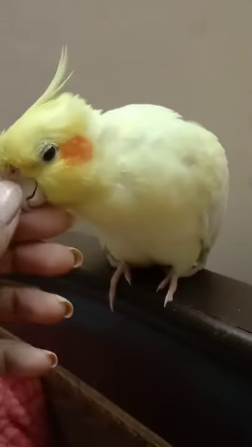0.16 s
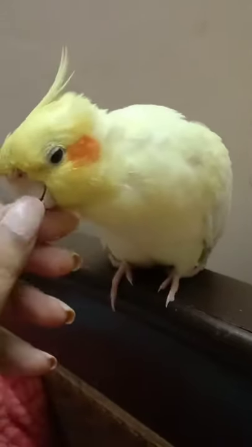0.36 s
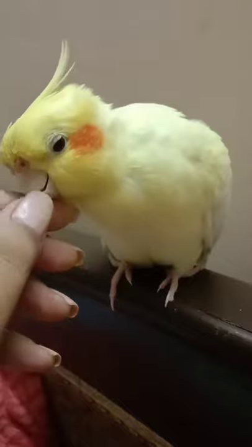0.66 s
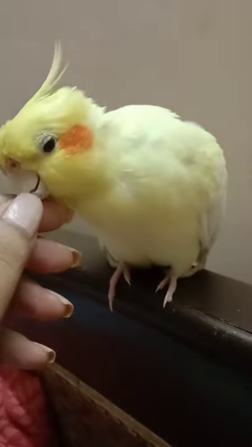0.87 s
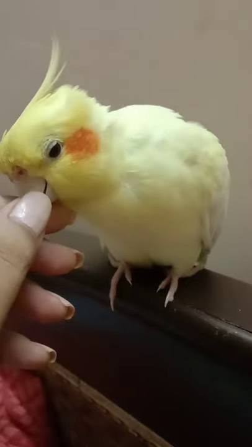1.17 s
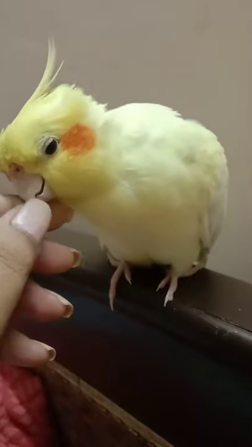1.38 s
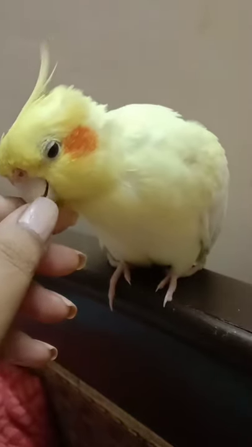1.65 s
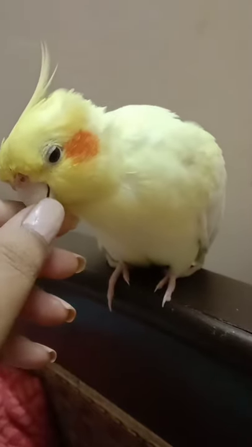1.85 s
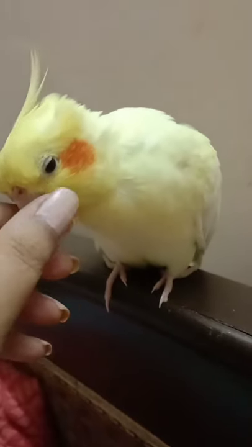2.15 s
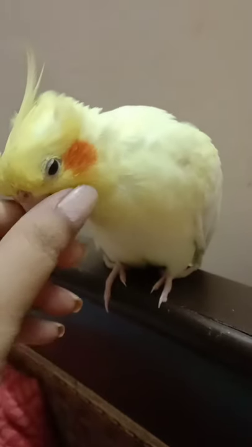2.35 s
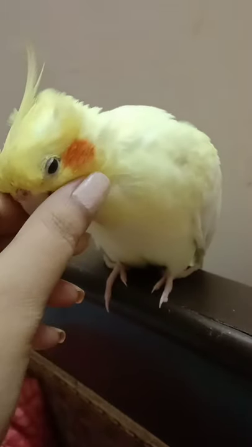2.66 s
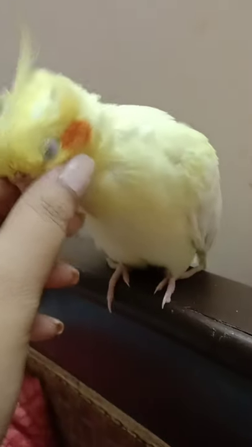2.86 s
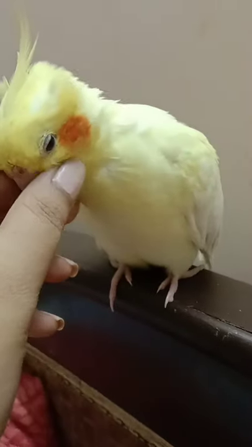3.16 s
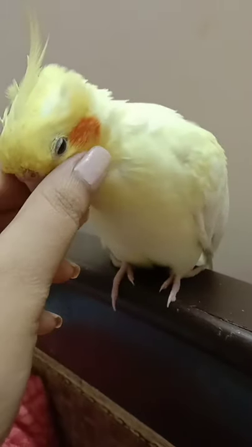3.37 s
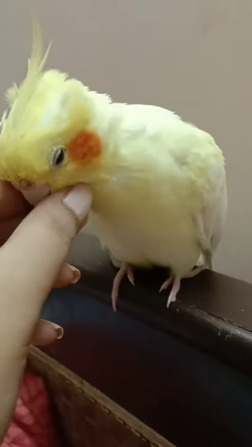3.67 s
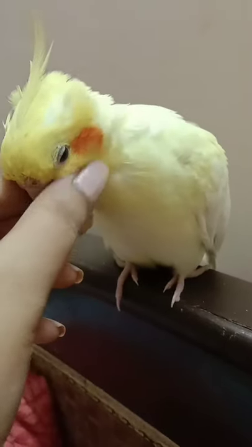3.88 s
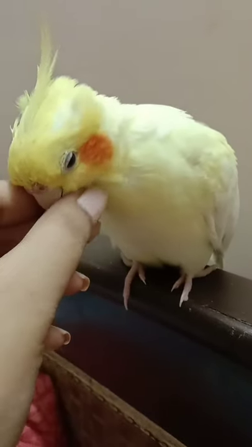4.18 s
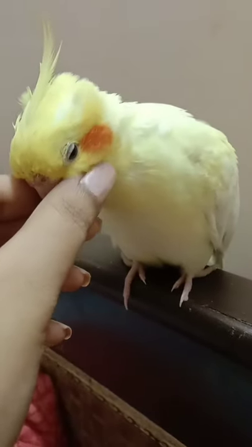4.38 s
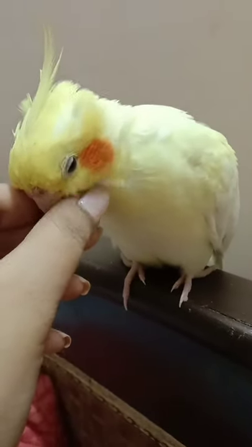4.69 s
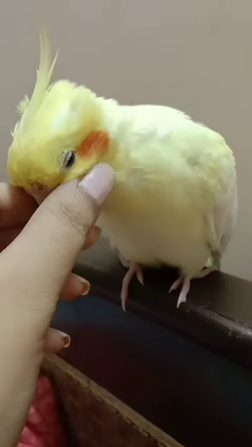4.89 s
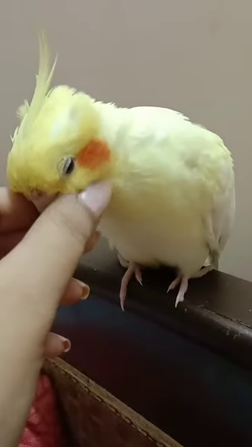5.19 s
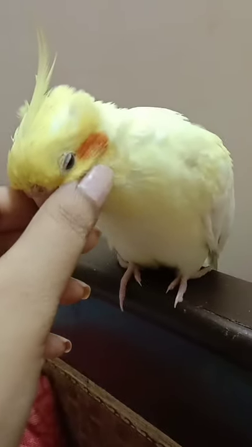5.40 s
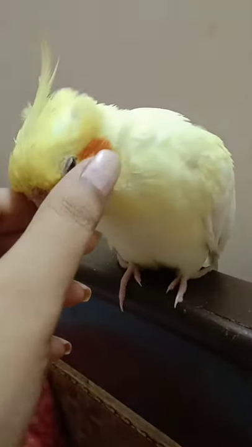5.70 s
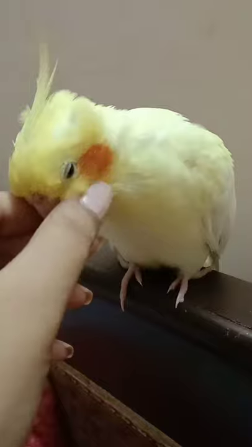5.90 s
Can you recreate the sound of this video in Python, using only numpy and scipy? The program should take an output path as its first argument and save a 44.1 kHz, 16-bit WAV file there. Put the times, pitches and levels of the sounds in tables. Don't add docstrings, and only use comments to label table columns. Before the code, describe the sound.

Two sharp, piercing bird chirps ring off nearby walls in a quiet home, with small knocks and scrapes, low lumpy hum and distant insects.

```python
import sys
import numpy as np
from scipy import signal
from scipy.fft import rfft, irfft, next_fast_len
from scipy.io import wavfile
from scipy.ndimage import uniform_filter1d, map_coordinates

SR = 44100
rng = np.random.default_rng(int(sys.argv[2]) if len(sys.argv) > 2 else 0)


def waveform_to_disk(signal):
    frames = np.transpose(np.atleast_2d(signal))
    scaled = np.clip(frames, -1, 1) * 32767
    samples = np.round(scaled).astype(np.int16)
    wavfile.write(sys.argv[1], SR, samples)


def boost(x):
    u = np.asarray(x, float) / 20
    return 10 ** u


N = 266364


def unit(x):
    return x / np.sqrt(np.mean(x ** 2) + 1e-20)


def along(points, hz):
    f, v = np.transpose(points)
    return np.interp(np.log(hz + 1), np.log(f + 1), v)


def wobble(rate):
    return map_coordinates(rng.standard_normal(N // 32), [np.arange(N) * rate / SR])


def filtered(x, response):
    m = next_fast_len(len(x) + SR // 4)
    return irfft(rfft(x, m) * response(np.fft.rfftfreq(m, 1 / SR)), m)[:len(x)]


def above(x, edge_hz):
    return filtered(x, lambda hz: 1 / (1 + (edge_hz / (hz + 1)) ** 12))


def rush(spectrum, patchy_db, size):
    z = signal.stft(rng.standard_normal(N), nperseg=512)[2]
    field = rng.standard_normal(z.shape)
    field = uniform_filter1d(field, size[0], axis=0)
    field = uniform_filter1d(field, size[1], axis=1)
    x = signal.istft(z * boost(patchy_db * unit(field)), nperseg=512)[1][:N]
    return unit(filtered(x, lambda hz: boost(along(spectrum, hz))))


# f/Hz, density/dB per Hz
INSECTS = [(1760, -43.5), (3000, -20), (3620, -12.5), (4180, -26.5), (4300, -7), (5010, -28), (5180, -4.5),
           (5520, -2), (6250, 0), (8650, .5), (9150, -12), (10400, -8), (11550, -10), (12300, -5),
           (15000, 0.5), (15700, -12)]
# t/s, level in 5.5-9 kHz/dB, swell lag/s, share of power that comes and goes/0-1
DRIFT = [(0, -65.5, 0.0042, .9), (.5, -62.5, .03, .6), (.95, -63, 0.031, .8), (1.4, -63.5, 0.011, .68),
         (2.2, -64, .02, .62), (3.0, -65, .03, 0.7), (3.5, -63, .035, 0.8), (4.4, -65, .04, .7),
         (4.95, -66.5, 0.064, .84), (5.3, -64, .065, .72), (5.9, -66, .03, .65)]
THROB_S = .303


def insects():
    t = np.arange(N) / SR
    s, strength_db, late_s, depth = np.transpose(DRIFT)
    turn = (t - np.interp(t, s, late_s)) / THROB_S
    depth = np.clip(np.interp(t, s, depth), 0, 1)
    throb = np.sqrt(1 - depth * np.sin(np.pi * turn) ** 2)
    smooth = above(rush(INSECTS, patchy_db=0.72, size=(5, 8)), edge_hz=4920)
    low_edge = [(1000, -38), (1500, -3.0), (3000, -9.5), (4400, 1.5), (5000, -7.0), (5600, -58.0)]
    blotchy = rush(low_edge, patchy_db=4, size=(2, 14))
    level_db = np.interp(t, s, strength_db) + 0.26 * wobble(rate=2.9)
    return boost(level_db) * throb * (boost(6.5) * smooth + boost(-9) * blotchy)


# f/Hz, density/dB per Hz
RUMBLE = [(15, -49), (25, -16), (59, -18), (103, 1), (248, -13), (318, -19), (500, -25), (650, -53),
          (1100, -120)]
# f/Hz, density/dB per Hz
AIR = [(180, -43.5), (300, 2), (630, -6), (684, -8.5), (907, -7), (1130, -7), (2350, -19), (4500, -7),
       (5000, -13.5), (6500, -39.5), (11000, -120)]
# t/s, level over steady hum/dB
LUMPS = [(.04, 8.5), (.22, 8.5), (.44, 13.5), (.63, 11), (.95, 2.5), (1.35, 8), (1.54, 4.5), (2.2, 5),
         (2.39, 5.5), (2.7, 5.5), (2.86, 8.5), (3.25, 12), (3.36, 8), (3.63, 9.5), (3.98, 6.5), (4.13, 4.5),
         (4.28, 10), (4.48, 3.5), (4.65, 5.5), (5.19, 12.5), (5.35, 8), (5.45, 6), (5.85, 6.5)]
HUM_DB, LUMP_S = -73, .03


def house():
    grid_s = np.arange(0, N / SR, .004)
    bumps_db = sum(db * np.exp(-((grid_s - s) / LUMP_S) ** 2 / 2) for s, db in LUMPS)
    lumps_db = np.interp(np.arange(N) / SR, grid_s, bumps_db)
    rumble = unit(boost(1.5 * wobble(rate=11)) * rush(RUMBLE, patchy_db=.5, size=(1, 6)))
    hum = boost(HUM_DB + lumps_db) * rumble
    air = boost(-77.0 + 0.46 * wobble(rate=2.6)) * rush(AIR, patchy_db=3.0, size=(2, 12))
    return hum + air


# multiple, level/dB
OVERTONES = [(2, -16), (3, -17.5)]
# f/Hz, gain/dB
BEAK = [(4500, -0.5), (6500, -1.5), (8300, 6), (10000, -6), (11600, -9.5), (12900, 4), (13900, -7),
        (15300, -2.5)]
# t/s, pitch f/Hz, level/dB, roughness/0-1
RISE = [
    (0.3014, 2230, -35.5, 0.02),
    (0.3059, 2342, -31.5, 0.1),
    (.311, 4440, -28, .2),
    (.320, 4208, -23, 0.24),
    (.328, 6000, -23, 0.14),
    (.340, 6350, -27, .2),
    (.354, 6000, -32, .14),
]
SWOOP = [
    (0.4053, 2250, -28, 0),
    (.411, 2330, -25.5, 0.026),
    (.429, 3002, -31, .07),
    (.443, 5850, -28, .06),
    (0.456, 5844, -33.5, .12),
    (0.457, 3818, -29.5, 0.12),
    (.481, 3625, -31, .06),
    (.487, 2017, -35.5, .04),
    (.497, 1820, -40, .05),
]
ARCH = [
    (3.075, 3587, -31.5, .03),
    (3.083, 4050, -26, .03),
    (3.089, 5950, -30.5, .2),
    (3.104, 5306, -27, .25),
    (3.114, 4787, -28.5, .08),
    (3.146, 5154, -26.5, 0.089),
    (3.169, 5542, -27.5, .15),
]
FALL = [
    (3.187, 2616, -28.5, .02),
    (3.206, 2675, -31, 0.044),
    (3.224, 2251, -40, .5),
    (3.229, 6085, -33, .5),
    (3.240, 4724, -28, 1),
    (3.250, 3796, -23.5, 1),
    (3.262, 3584, -23, .25),
    (3.284, 3494, -26, .06),
]


def bird():
    t = np.arange(N) / SR
    syllables = (RISE, SWOOP, ARCH, FALL)
    s, pitch_hz, level_db, share = np.transpose(RISE + SWOOP + ARCH + FALL)
    sounding = sum((t >= rows[0][0]) & (t < rows[-1][0]) for rows in syllables)
    rough = np.clip(np.interp(t, s, share), 0, 1)

    gain = sounding * boost(np.interp(t, s, level_db) + 11.5)
    gain = uniform_filter1d(uniform_filter1d(gain, size=50), size=50)
    gain = gain * boost(9 * rough * np.tanh(wobble(rate=500)))

    pitch = uniform_filter1d(np.interp(t, s, pitch_hz), size=40)
    pitch = pitch * np.exp(.26 * rough * np.tanh(wobble(rate=700)))
    phase = 2 * np.pi * np.cumsum(pitch) / SR

    turned_db = -3.5 * (t > 2)
    upper = 0
    for k, db in OVERTONES:
        overtone_db = db + (k - 1.5) * turned_db + along(BEAK, k * pitch)
        upper = upper + boost(overtone_db) * (k * pitch < SR / 2) * np.sin(k * phase)
    hiss = boost(-35.5 + 20 * rough) * above(rng.standard_normal(N), edge_hz=3400)
    return above(gain * (np.sin(phase) + upper + hiss), edge_hz=1900)


# f/Hz, t60/s
ROOM = [(200, 0.9), (1800, 0.35), (4750, 0.41), (12500, 0.42)]


def tail(stretch):
    hz, t, z = signal.stft(rng.standard_normal(SR // 2), SR, nperseg=256)
    t60_s = stretch * along(ROOM, hz)[:, None]
    x = signal.istft(z * boost(-60 * t / t60_s), SR, nperseg=256)[1]
    return x / np.linalg.norm(x)


# delay/s, level/dB
WALLS = [
    (.0045, -6),
    (.0105, -2.5),
    (.016, -6),
    (.021, -15),
    (.031, -10),
]
# f/Hz, level/dB, t60/s
RINGS = [(3605, -40, .4)]
SOAK_HZ, SOAK_DB = 2860, -6.5


def room(x):
    t = np.arange(SR) / SR
    answer = np.zeros(SR)
    answer[0] = 1
    short = t[:SR // 100]
    for delay_s, db in WALLS:
        smear = 0.067 * boost(-60 * short / 0.012) * rng.standard_normal(len(short))
        smear[0] = 1
        answer[round(delay_s * SR):][:len(short)] += boost(db) * smear
    late = tail(stretch=0.84)
    answer[:len(late)] += boost(6) * late * (1 - np.exp(-t[:len(late)] / 0.0081))
    answer[1:] = filtered(answer[1:], lambda hz: boost(SOAK_DB / (1 + (hz / SOAK_HZ) ** 8)))
    for hz, db, t60_s in RINGS:
        answer += boost(db - 25.0 - 60 * t / t60_s) * np.sin(2 * np.pi * hz * t)
    return signal.fftconvolve(x, answer)[:N]


# f/Hz, width/Hz, level/dB
FURNITURE = [(220, 39, 0.5), (296, 18, -1), (450, 140, -1.5), (885, 120, 0.5), (1095, 41, -1.5),
             (1333, 170, -1), (1563.5, 160, -0.5), (2010, 79, -0.5), (2450, 120, 0.5), (2800, 450, -6),
             (3330, 219.7, -2.5), (3900, 220, -3.5), (4470, 71, -1)]


def furniture(f):
    modes = 0
    for k, (centre_hz, width_hz, db) in enumerate(FURNITURE):
        damping = 1j * f * width_hz
        modes = modes + (-1) ** k * boost(db) * damping / (centre_hz * centre_hz - f * f + damping)
    return modes


# t/s, click level/dB, click f/Hz, thud level/dB, thud f/Hz
KNOCKS = [
    (1.298, -68, 1280, -71.5, 355),
    (2.174, -68.5, 1489, -65, 220),
    (2.175, -71, 3640, -70, 687),
    (2.316, -74, 1842, -68.5, 362),
    (3.542, -73, 1440, -71.5, 411.2),
    (3.68, -78.5, 1392, -68.5, 320),
    (3.742, -55, 1335, -58, 274),
    (4.29, -70, 1251, -62.5, 231),
    (5.259, -83.5, 1695, -76, 255),
]
# t/s, level/dB, f/Hz,
# length/s
SCRAPES = [(.34, -70, 1500, 0.17), (1.10, -78, 1730, .038), (1.805, -66.5, 2550, .02),
           (1.83, -72.5, 1410, .05), (1.817, -62, 4060, 0.076), (2.11, -73, 1638, 0.056),
           (2.325, -75, 3900, .018), (3.09, -70, 1584, .033), (3.223, -63.5, 1601, .15),
           (5.399, -78, 1810, .094), (5.82, -76, 1400, .02)]
CONTACT_S, HARD_DB = .042, -62
UNDER_DB, UNDER_HZ, UNDER_DB_PER_S = -26.5, 949.7, 150.5


def knocks():
    out = np.zeros(N + SR)
    t = np.arange(SR // 4) / SR
    contacts = [(*row, CONTACT_S / (1 + boost(row[1] - HARD_DB) ** 2)) for row in KNOCKS]
    for s, db, hz, length_s in SCRAPES:
        under_db = db + UNDER_DB + UNDER_DB_PER_S * length_s
        contacts.append((s, db, hz, under_db, UNDER_HZ, length_s))
    for s, db, hz, thud_db, thud_hz, contact_s in contacts:
        bursts = rng.standard_normal((2, len(t))) * boost(-10 * t / contact_s) * (t < contact_s)
        late = tail(stretch=.6)
        late[0] += .45
        parts = [(bursts[0], db, hz, .65), (bursts[1], thud_db, thud_hz, .45)]
        for noise, level_db, centre_hz, octaves in parts:
            wet = signal.fftconvolve(noise, late)[:SR // 2]
            wet = filtered(wet, lambda f: furniture(f)
                           * np.exp(-((np.log2((f + 1) / centre_hz) / octaves) ** 4)))
            out[round(s * SR):][:len(wet)] += boost(level_db) * wet / wet[:SR // 10].std()
    return out[:N]


def after_tone():
    t = np.maximum(np.arange(N) / SR - 3.3, 0)
    flicker_db = 3.5 * wobble(rate=40)
    decay = boost(-58.5 - 60 * t / 1.4 + flicker_db)
    return (1 - np.exp(-t / .03)) * decay * np.sin(2 * np.pi * 3110 * t)


def scene():
    background = insects() + house()
    return (background + boost(-9) * room(bird()) + knocks() + after_tone())[None]


# f/Hz, share of usual power taken out/0-1
SUPPRESS = [(60, 0.3), (200, 0.11), (500, 0.36), (4900, 0.45), (5400, 0.18), (15000, .5)]


def suppressed(x, floor_db):
    hz, _, z = signal.stft(x, SR, nperseg=768, noverlap=576)
    power = np.abs(uniform_filter1d(np.abs(z) ** 2, size=9, axis=1)) + 1e-20
    usual = uniform_filter1d(np.median(power, axis=1), size=9)
    taken = (along(SUPPRESS, hz) * usual)[:, None]
    gain = np.clip(1 - taken / power, boost(floor_db), 1)
    return signal.istft(z * gain, SR, nperseg=768, noverlap=576)[1][:N]


def top_cut(x):
    return signal.sosfilt(signal.butter(12, 15840, fs=SR, output="sos"), x)


def record(dry):
    clean = filtered(suppressed(dry[0], floor_db=-7.5), lambda hz: hz < 15780)
    return top_cut(clean[None])


dry = scene()
out = record(dry)
waveform_to_disk(out)
```